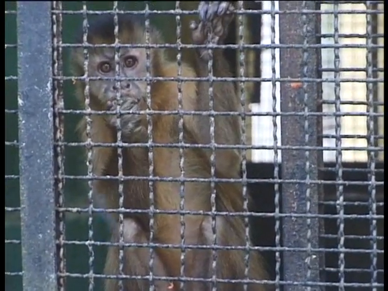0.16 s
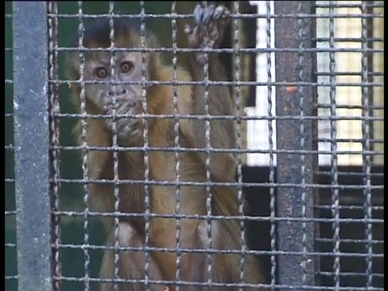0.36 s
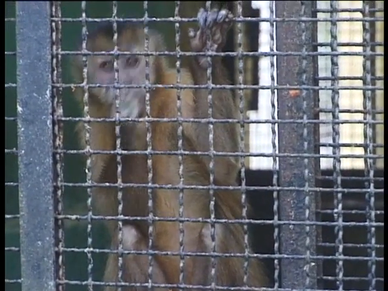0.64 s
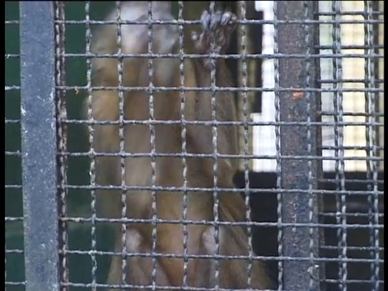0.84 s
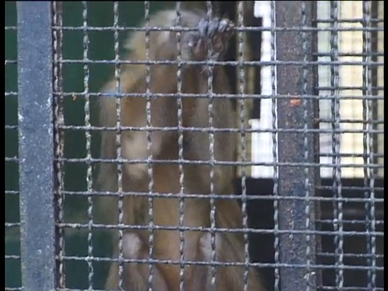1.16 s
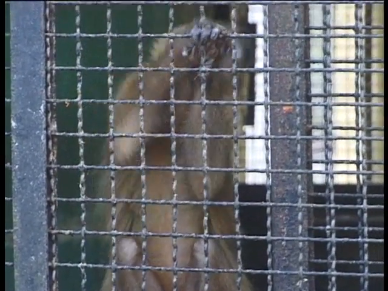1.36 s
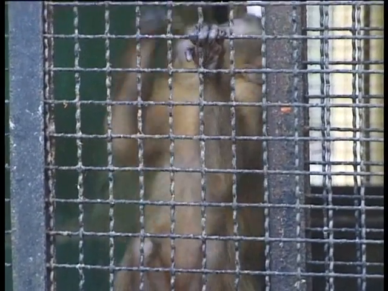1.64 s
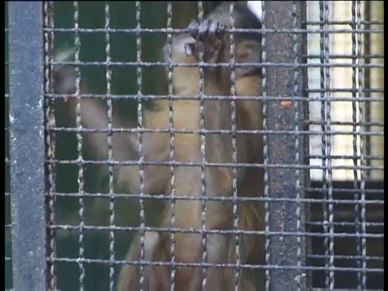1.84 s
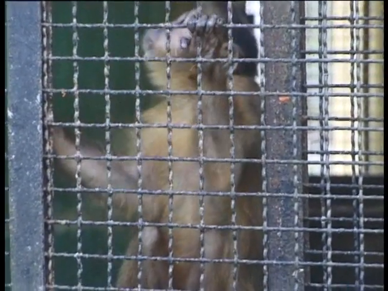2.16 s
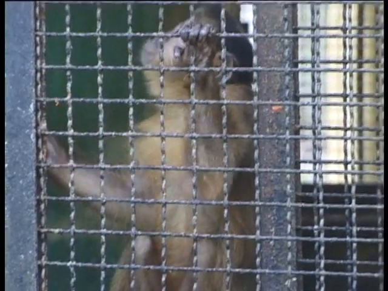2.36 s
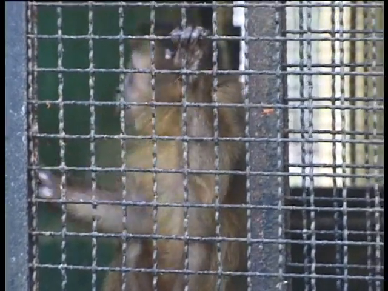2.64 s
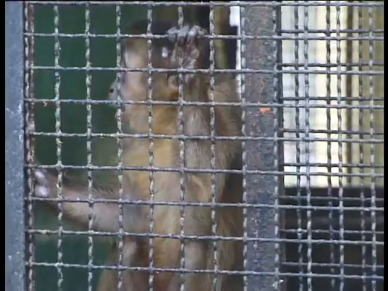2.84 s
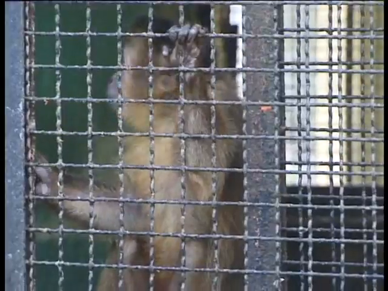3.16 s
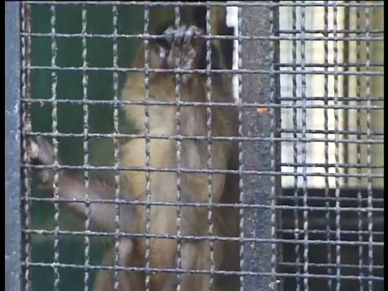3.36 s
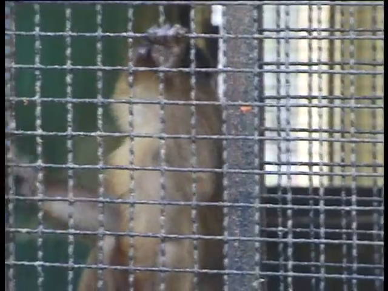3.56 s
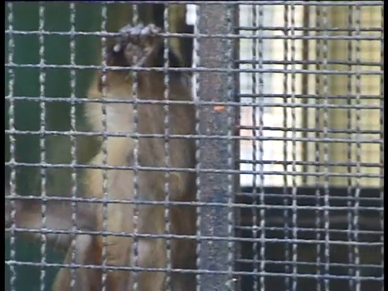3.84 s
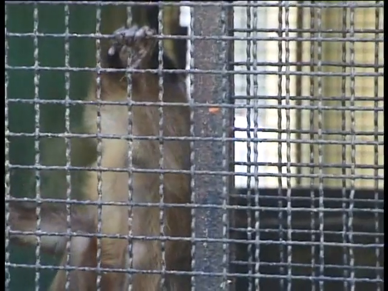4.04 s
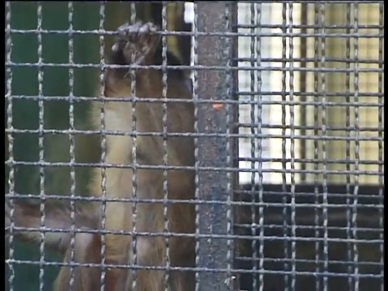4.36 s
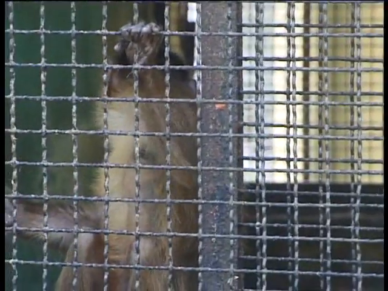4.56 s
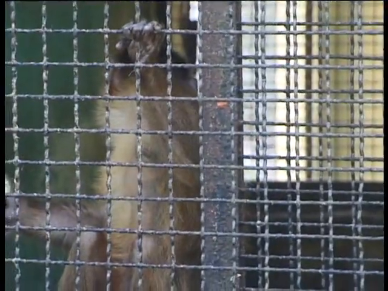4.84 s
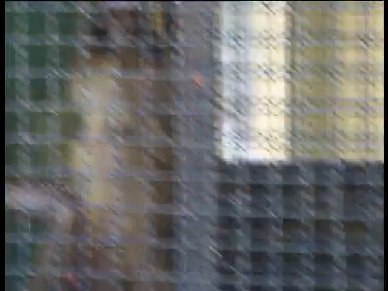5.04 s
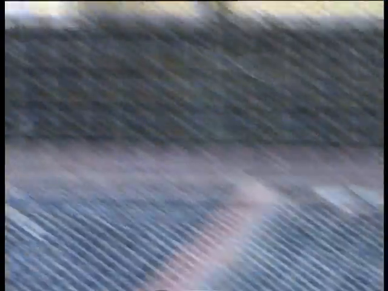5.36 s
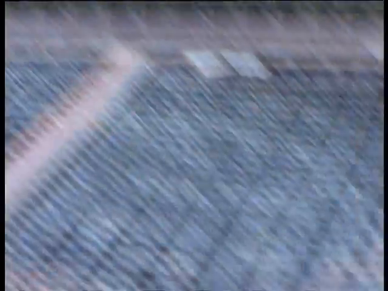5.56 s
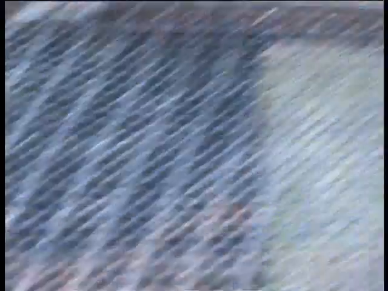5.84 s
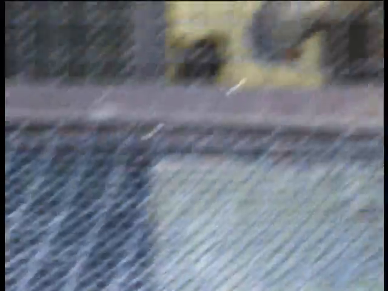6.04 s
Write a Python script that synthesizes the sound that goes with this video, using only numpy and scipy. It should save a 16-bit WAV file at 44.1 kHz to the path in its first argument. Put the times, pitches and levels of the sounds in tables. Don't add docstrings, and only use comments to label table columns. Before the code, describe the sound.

High, pure monkey whistles repeat in rapid runs inside a mesh enclosure, with gusty low rumble, faint rustles, claw ticks and soft grunts.

```python
import sys
import numpy as np
from scipy import signal
from scipy.fft import rfft, irfft, next_fast_len
from scipy.io import wavfile
from scipy.ndimage import uniform_filter1d, map_coordinates

SR = 44100
rng = np.random.default_rng(int(sys.argv[2]) if len(sys.argv) > 2 else 0)


def int16_out(signal):
    q = np.round(np.clip(np.atleast_2d(signal).T, -1, 1) * 32767)
    wavfile.write(sys.argv[1], SR, q.astype(np.int16))


def level_to_linear(level):
    exponent = np.asarray(level, float) / 20
    return 10 ** exponent


N = 273197


def unit(x):
    return x / np.sqrt(np.mean(x ** 2) + 1e-20)


def along(points, hz):
    f, v = np.transpose(points)
    return np.interp(np.log(hz + 1), np.log(f + 1), v)


def curves(rows):
    s, *cols = np.transpose(rows)
    return [np.interp(np.arange(N) / SR, s, c) for c in cols]


def wobble(rate):
    return map_coordinates(rng.standard_normal(1000), [np.arange(N) * rate / SR])


def sides(db):
    return level_to_linear(np.array([db / 2, -db / 2]))


def add(track, s, x):
    part = track[..., round(s * SR):round(s * SR) + x.shape[-1]]
    part += x[..., :part.shape[-1]]


def tone(hz, orders):
    phase = 2 * np.pi * np.cumsum(hz) / SR
    return np.sqrt(2) * sum(level_to_linear(db) * np.sin(k * phase + k) for k, db in orders)


def gate(t, length, rise, fall):
    opening = np.clip(t / rise, 0, 1)
    closing = np.clip((length - t) / fall, 0, 1)
    return np.sin(np.pi / 2 * opening * closing) ** 2


def rush(spectrum, alike, patchy_db):
    # (frequency [Hz], left minus right [dB])
    lean = [(60, -0.5), (180, -4), (550, -2.5), (1650, 2), (4970, 0.5), (15000, 2.5)]
    hz, _, z = signal.stft(rng.standard_normal((2, N + 4096)), SR, nperseg=2048)
    field = uniform_filter1d(rng.standard_normal(z.shape[1:]), size=20, axis=0)
    field = uniform_filter1d(field, size=3, axis=1)
    turn = np.arccos(np.clip(along(alike, hz), -1, 1))[:, None] / 2
    z = z * level_to_linear(along(spectrum, hz)[:, None] + patchy_db * unit(field))
    mid, side = z[0] * np.cos(turn), z[1] * np.sin(turn)
    pair = np.array([mid + side, mid - side]) * sides(along(lean, hz))[..., None]
    return unit(signal.istft(pair, SR, nperseg=2048)[1][:, :N])


def air():
    # (time [s], strength [dB])
    wind = [(0.0, -35.5), (0.55, -35), (0.96, -34.5), (1.5, -30.5), (1.53, -47.5), (1.58, -31.5),
            (2.83, -32.5), (3.07, -36.5), (3.72, -31), (3.84, -42.5), (3.96, -27.5), (4.02, -33.5),
            (4.74, -37.5), (4.77, -42.5), (5.57, -30.5), (5.64, -35), (6.14, -29.5), (6.19, -37.5)]
    # (time [s], half width [s], change [dB])
    gusts = [(.19, .08, 2.5), (.29, 0.052, -3), (.4, 0.14, 4), (.48, 0.019, -4.5), (.58, 0.025, 5.5),
             (1.26, 0.016, -6.5), (1.95, 0.021, 2.5), (2.6, 0.073, -0.5), (2.81, 0.034, 2), (3.65, 0.32, 0),
             (4.28, 0.065, -4.5), (4.47, 0.026, 5.5), (5.03, 0.11, 4), (5.12, 0.017, -5),
             (5.773, 0.0067, 11)]
    # (time [s], peak [dB], left minus right [dB])
    thumps = [(0.032, -21.5, 7), (0.425, -16.5, 4), (0.648, -15, -2), (0.81, -13, -7), (1.217, -13, -6.5),
              (1.4, -13.5, -5), (1.469, -33, -2.5), (1.578, -32, -9), (3.299, -35, -33), (3.473, -18.5, -5),
              (3.732, -12.5, -5), (3.946, -7.5, 3), (4.095, -18, -6), (4.301, -27, -25), (5.151, -15, -6),
              (5.255, -16.5, -5)]
    # (time [s], level [dB])
    turning = [(0, 0.5), (1.2, -0.5), (1.55, -3.5), (2, -1.5), (3.4, -2), (4.5, -6.5), (5.2, -5), (5.7, -8),
               (6.19, -8.5)]
    # (frequency [Hz], level per Hz [dB])
    rumble = [(8, -45), (20, -11.5), (50, 1), (103, -1), (180, -10), (300, -18.5), (470, -26.5), (800, -40),
              (1500, -97)]
    # (frequency [Hz], level per Hz [dB])
    park = [(250, -42), (450, -9.5), (800, -10), (1600, -12.5), (2700, -11.5), (4000, -12), (6000, -11.5),
            (8500, -18.5), (11000, -25.5), (15000, -28)]
    # (frequency [Hz], level per Hz [dB])
    hiss = [(2500, -36), (5000, -0.5), (7100, -8.5), (10000, -14.5), (13300, -25), (14700, -31.5),
            (15400, -23), (16000, -82)]
    # (frequency [Hz], left-right likeness)
    ports = [(30, 1), (90, 0.77), (180, 0.71), (350, 0.43)]
    # (frequency [Hz], left-right likeness)
    alike = [(60, 0.82), (180, -0.63), (550, 0.9), (1650, 0.43), (4970, -0.4), (15000, 0.16)]

    (buffet_db,), (turn_db,) = curves(wind), curves(turning)
    t = np.arange(N) / SR
    buffet_db = buffet_db + sum(db * np.exp(-((t - s) / half) ** 2) for s, half, db in gusts)
    port_lumps = np.array([wobble(27.0), wobble(36)])
    lumps = level_to_linear(1.1 * wobble(17) + 0.69 * port_lumps)
    out = level_to_linear(buffet_db + 0.5) * unit(lumps * rush(rumble, ports, patchy_db=1.08))
    out += level_to_linear(-45 + turn_db + 0.7 * wobble(8.3)) * rush(park, alike, patchy_db=1.27)
    out += level_to_linear(-58 + 0.38 * turn_db) * rush(hiss, alike, patchy_db=0.8)
    t = np.arange(-900, 900) / SR
    push = -t / 0.00097 * np.exp(-(t / 0.0015) ** 2 / 2)
    for s, db, pan in thumps:
        add(out, max(s - .015, 0), level_to_linear(db - 8.0) * sides(pan)[:, None] * push)
    return out


def whistler():
    # (time [s], length [s], pitch [Hz], level [dB], glide [Hz])
    first_trills = [(0.405, 0.029, 2785, -35.5, 122), (0.48, 0.021, 3060, -35.5, -103.0),
                    (0.553, 0.023, 3140, -30, -72.0), (0.63, 0.024, 3200, -31.5, -64),
                    (0.7016, 0.027, 3224, -32, -26), (0.836, 0.0066, 3340, -37.5, -50),
                    (0.846, 0.016, 3280, -39.5, 11), (0.871, 0.011, 3310, -43, 15),
                    (0.885, 0.008, 3290, -40, -100), (0.935, 0.027, 3340, -30.5, -43),
                    (1.0034, 0.024, 3346, -26, -25), (1.0707, 0.025, 3350, -23.5, -29),
                    (1.139, 0.021, 3350, -25, -28), (1.1928, 0.028, 3390, -25.5, -68),
                    (2.0797, 0.031, 2986, -33, -60), (2.1624, 0.019, 3160, -31.5, -79),
                    (2.236, 0.022, 3293, -29.0, -79), (2.3083, 0.023, 3377, -29, -90),
                    (2.385, 0.026, 3370, -27.5, -51), (2.461, 0.0266, 3485, -26, -141.0),
                    (2.5406, 0.022, 3487, -22, -52), (2.615, 0.022, 3574, -19, -122.0),
                    (2.686, 0.021, 3540, -19.5, -75), (2.7586, 0.019, 3660, -18, -117.0),
                    (2.8296, 0.018, 3755, -20.5, -162.0), (2.9043, 0.018, 3913, -21.5, -107.0),
                    (2.976, 0.02, 3758, -20.5, -308.0), (3.0557, 0.017, 3346, -32.5, -33)]
    # (time [s], length [s], pitch [Hz], level [dB], glide [Hz])
    later_trills = [(3.19, 0.043, 3357, -23.5, 42), (3.276, 0.019, 3705, -20, 94),
                    (3.3613, 0.019, 4150, -23, 23), (3.439, 0.022, 4218, -23.5, -131.0),
                    (3.5177, 0.018, 4176, -19.5, -292.0), (3.6017, 0.012, 3856, -21.5, -331.0),
                    (3.7723, 0.048, 3380, -24, 117), (3.8554, 0.021, 3660, -19, -52),
                    (3.934, 0.02, 3924, -19, -107.0), (4.0146, 0.016, 4065, -21.5, -194.0),
                    (4.109, 0.016, 3340, -40, -48), (4.5027, 0.02, 4186, -29, 18),
                    (4.598, 0.0233, 4374, -27.5, -100), (4.68, 0.016, 4250, -20, 50),
                    (4.7697, 0.013, 4077, -23.5, -39), (4.8535, 0.015, 4145, -21.5, -67),
                    (4.9387, 0.017, 3970, -33, -900), (5.286, 0.019, 3330, -36, -300)]
    # (time [s], pitch [Hz], level [dB])
    long_whistle = [(1.249, 3320, -35.5), (1.275, 3350, -24), (1.355, 3335, -22.5), (1.39, 3351, -29),
                    (1.44, 3355, -28), (1.487, 3340, -24), (1.508, 3328, -30), (1.544, 3342, -24.5),
                    (1.587, 3330, -32.5), (1.62, 3244, -39), (1.643, 3110, -42)]
    # (time [s], overtone [dB])
    mouth = [(.45, 8), (.65, -3), (.85, -2.5), (1.05, -12), (1.2, -13.5), (2.1, 3.5), (2.5, -9),
             (2.95, -22.5), (3.19, -17), (3.28, -27), (3.6, -24), (3.77, -10.5), (4.015, -32.5),
             (4.11, -18), (4.55, -2.5), (4.68, -9), (4.82, -6), (5.29, -4.5)]
    # (time [s], share of pitch)
    sag = [(.4, 0.062), (.5, 0.15), (.85, 0.057), (1.0, 0.13), (1.2, 0.082), (2.08, .04), (2.2, 0.23),
           (2.7, 0.076), (2.98, 0.16), (3.06, 0.035), (3.28, 0.13), (3.36, 0.23), (3.52, 0.21),
           (3.6, 0.054), (3.77, 0.038), (3.9, 0.1), (4.5, 0.1), (4.68, 0.13), (4.86, 0.08), (4.94, .05),
           (5.29, 0.077)]

    out, notes = np.zeros((2, N)), first_trills + later_trills
    gaps = np.diff([row[0] for row in notes], prepend=0)
    openers = (gaps > .12) | (gaps < .04)
    for (s, length, hz, db, glide), after_gap in zip(notes, openers):
        opener = after_gap and s != first_trills[5][0]
        over_db, droop = np.interp(s, *np.transpose(mouth)), np.interp(s, *np.transpose(sag))
        t = np.arange(round((length + 0.0033) * SR)) / SR
        ending = np.exp((t - t[-1]) / 0.0023)
        flick = (0.2 if opener else 1) * np.clip(4300 - hz, 0, 900) * np.exp(-t / 0.0012)
        even_glide = 0.72 * glide * t / length
        pitch = (hz + even_glide) * (1 - droop * ending) + flick

        thin_third = s > 5.1 or 3.7 < s < 3.8 or 3.1 < s < 3.2 or s < .52
        third_db = over_db - 16.5 - 14 * thin_third - 14 * max(hz - 3350, 0) / 1000 - 4 * (s < 1.3)
        hook_db = min(22, 2 - over_db) if s < 4.4 else -12
        overtones = tone(pitch, [(2, over_db), (3, third_db)])
        overtones = level_to_linear(hook_db * ending - 0.083 * flick) * overtones
        parts = np.array([tone(pitch, [(0.99, 0.0044)]), overtones])

        swells = opener and length > .025
        swell_db = -8 * swells * (1 - t / t[-1])
        shape = gate(t, t[-1], rise=0.0027 + 0.0011 * (hz > 4050), fall=0.0065 + 0.0037 * swells)
        add(out, s - .001, level_to_linear(db + swell_db) * shape * parts)

    t = np.arange(N) / SR
    unsteady = 1.5 + 1.9 * np.exp(-((t - .87) / .04) ** 2)
    out = out * level_to_linear(1.17 * wobble(90) * unsteady)

    hz, db = curves(long_whistle)
    start, end = long_whistle[0][0], long_whistle[-1][0]
    t = t - start
    hz = hz + 3 * wobble(39.45) + 700 * np.exp(-np.abs(t) / 0.0029)
    held = gate(t, end - start, rise=0.0027, fall=0.0067) * level_to_linear(db)
    return out + held * [tone(hz, [(1, 0.0055)]), tone(hz, [(2, -17.5), (3, -40.5)])]


def near_walls(x):
    # (delay [s], level [dB], left minus right [dB])
    echoes = [
        (.0043, -35.5, -5),
        (0.0104, -13.5, 2),
        (.017, -22, 2),
    ]
    out = np.zeros((2, N))
    for s, db, pan in echoes:
        add(out, s, level_to_linear(db) * sides(pan)[:, None] * x)
    return out


def walls(x):
    # (frequency [Hz], time to fall 60 dB [s])
    decay = [(700, 0.32), (3500, 0.43), (8000, 0.33)]
    out, step = np.zeros((2, N)), round(.31 * SR)
    for i in range(0, N, step):
        hz, t, z = signal.stft(rng.standard_normal((2, SR // 2)), SR, nperseg=256)
        tail = signal.istft(z * level_to_linear(-60 * t / along(decay, hz)[:, None]), SR, nperseg=256)[1]
        build = 1 - np.exp(-np.arange(tail.shape[1]) / SR / 0.0024)
        tail = (tail + 0.08 * tail[::-1]) * build
        answer = signal.fftconvolve(x[None, i:i + step], tail / np.linalg.norm(tail[0]), axes=1)
        add(out, i / SR + .008, answer)
    return out


def rustle():
    # (time [s], length [s], centre [Hz], level [dB])
    brushes = [(0.75, 0.071, 3260, -41.5), (0.752, 0.048, 7000, -51), (1.735, 0.017, 885, -46),
               (1.973, 0.045, 920, -41.5), (1.972, 0.029, 3280, -43.5), (2.139, 0.072, 5600, -47.5),
               (2.214, 0.081, 520, -46), (3.291, 0.16, 1750, -54), (3.3, 0.17, 6140, -45),
               (3.452, 0.18, 5730, -47.5), (3.524, 0.41, 10300, -61.5), (3.771, 0.21, 6100, -47),
               (5.164, 0.31, 1170, -55.5), (5.299, 0.041, 4020, -45), (5.493, 0.085, 5000, -53.5),
               (5.509, 0.11, 7000, -54.5), (5.49, 0.072, 9000, -56.5), (5.66, 0.012, 2550, -52),
               (5.816, 0.044, 2200, -40.5), (5.961, 0.11, 2480, -52), (6.101, 0.052, 2500, -50),
               (6.143, 0.065, 5960, -53)]
    # (time [s], peak [dB])
    ticks = [(2.33, -42), (.765, -37), (.772, -39), (.783, -41), (4.526, -36.5), (5.306, -32), (5.313, -36),
             (5.318, -34), (5.327, -37), (5.669, -46), (5.825, -51), (5.845, -51)]
    out, noise = np.zeros((2, N)), rng.standard_normal((32, 3, 12000))
    t = np.arange(noise.shape[2]) / SR
    for (s, length, hz, db), (left, right, size) in zip(brushes, noise):
        grain_db = 2.2 * unit(uniform_filter1d(size, size=60))
        clump_db = 1.3 * unit(uniform_filter1d(size[::-1], size=700))
        grains = level_to_linear(grain_db + clump_db) * [left, right + .5 * left]
        band = signal.butter(3, [hz * 0.47, min(hz * 1.37, 14000)], "band", fs=SR, output="sos")
        shape = gate(t, length * 1.41, rise=0.26 * length, fall=0.98 * length)
        add(out, s, level_to_linear(db) * unit(signal.sosfilt(band, grains)) * shape)
    wire = signal.butter(2, [1100, 6500], "band", fs=SR, output="sos")
    for (s, db), (tick, *_) in zip(ticks, noise[::-1]):
        click = signal.sosfilt(wire, tick * level_to_linear(-60 * t / 0.02))
        add(out, s, level_to_linear(db) * click * np.ones((2, 1)))
    return out


def mates():
    # (time [s], length [s], pitch [Hz], level [dB], echo [dB])
    calls = [
        (1.709, 0.035, 765, -37.5, -2),
        (1.941, 0.042, 794, -38.5, -2),
        (5.281, 0.0079, 4050, -40.5, 9.5),
        (5.301, 0.016, 3910, -48.5, -13),
        (5.751, 0.023, 2150, -37, -4),
        (5.806, 0.035, 769, -46.5, 10.5),
        (5.942, 0.0495, 2063, -52.5, 12.5),
        (5.981, 0.057, 803, -49.5, 10.5),
        (6.164, 0.042, 805, -52.5, 15),
    ]
    # (multiple of pitch, level [dB])
    voices = [
        [(1, -2.5), (2, -2.5), (3, -5), (4, -15), (5, -14), (6, -10), (7, -35)],
        [(1, 1), (2, -5.5), (3, -7), (4, -10.5), (5, -6), (6, -22), (7, -29)],
        [(1, 1)],
        [(1, 8.5)],
        [(1, -22), (2, 0.5), (3, -14)],
        [(1, -13), (2, 5), (3, 0), (4, -2), (5, 2), (6, -13), (7, -13)],
        [(1, 0), (2, -7), (3, -6.5)],
        [(1, -5.5), (2, 0.5), (4, -21), (5, -3.5)],
        [(1, -6), (2, 5), (4, -8), (5, 4.5)],
    ]
    out = np.zeros((2, N))
    for (s, length, hz, db, echo_db), voice in zip(calls, voices):
        t = np.arange(round((length + 0.0067) * SR)) / SR
        ending = np.exp((t - t[-1]) / 0.0064)
        fall = 0.24 if hz < 1000 else 0.026
        pitch = hz * (1 - 0.038 * (2 * t / length - 1) ** 2 - fall * ending)
        overtones = level_to_linear(-22 * ending) * tone(pitch, voice[1:])
        call = level_to_linear(db) * gate(t, t[-1], rise=0.0075, fall=0.0063) * (tone(pitch, voice[:1]) + overtones)
        add(out, s, np.array([call, level_to_linear(echo_db) * call]))
    hoarse = 1 + 0.21 * unit(uniform_filter1d(rng.standard_normal(N), size=90))
    return out * level_to_linear(2.0 * wobble(60)) * hoarse


def bird():
    # (time [s], length [s], from [Hz], to [Hz], level [dB])
    slurs = [
        (2.082, .03, 3800, 7500, -54),
        (2.112, .055, 6200, 4200, -53),
    ]
    out = np.zeros(N)
    for s, length, from_hz, to_hz, db in slurs:
        t = np.arange(round(length * SR)) / SR
        pitch = from_hz + (to_hz - from_hz) * t / length
        add(out, s, level_to_linear(db) * gate(t, length, rise=0.0073, fall=.008) * tone(pitch, [(1, 0)]))
    return out


def swish():
    # (time [s], length [s], from [Hz], to [Hz], level [dB])
    strokes = [
        (3.303, 0.18, 6650, 7360, -49),
        (3.472, .15, 6250, 5830, -55),
        (5.498, 0.074, 4330, 5640, -56),
        (5.523, 0.12, 7100, 8200, -53),
        (5.507, 0.051, 8800, 9200, -59),
        (5.552, 0.094, 3940, 3640, -58),
        (5.576, 0.071, 5600, 5640, -60),
    ]
    out, noise = np.zeros((2, N)), rng.standard_normal((12, 2, 2, 9000))
    t = np.arange(noise.shape[3]) / SR
    soft = signal.butter(2, 500, fs=SR, output="sos")
    for (s, length, from_hz, to_hz, db), pair in zip(strokes, noise):
        hz = from_hz + (to_hz - from_hz) * np.minimum(t / length, 1)
        phase = 2 * np.pi * np.cumsum(hz) / SR
        a, b = unit(signal.sosfilt(soft, pair))
        breath = a * np.cos(phase) + b * np.sin(phase)
        add(out, s, level_to_linear(db) * breath * gate(t, length, rise=0.26 * length, fall=0.32 * length))
    return out


def scene():
    # (time [s], left minus right [dB])
    balance = [(.41, -14), (.49, -8), (.63, -13.5), (.72, -7.5), (1.2, -3), (2.12, -11.5), (2.35, -4.5),
               (2.69, -4), (2.83, -9), (2.9, -3), (3.28, -5), (3.51, 2.5), (3.6, -6), (3.77, -4),
               (3.86, -4), (3.93, -2.5), (4.83, 0), (4.94, -11)]
    # (time [s], echo [dB])
    facing = [(.4, 4.5), (.6, -4), (.72, 6.5), (.84, 6), (1, 5), (1.2, 3.5), (1.45, -1.5), (2.1, 0),
              (2.35, 3), (2.55, 1), (2.8, -4.5), (3.0, 0), (3.06, 5), (3.19, 2.5), (3.28, 0.5), (3.44, 0),
              (3.5, 2), (3.8, -7.5), (4.02, -0.5), (4.5, -0.5), (4.7, 1.5), (4.85, -2), (5.29, 2.5)]
    (base, over), (far, sent) = whistler(), mates()
    near = base * sides(curves(balance)[0]) + over * sides(-6.0)[:, None]
    size = next_fast_len(N)
    lag = np.exp(-2j * np.pi * np.fft.rfftfreq(size, 1 / SR) * 40e-6)
    near[0] = irfft(rfft(near[0], size) * lag, size)[:N]
    wet = level_to_linear(-9.5) * walls(level_to_linear(curves(facing)[0]) * (base + over) + sent)
    animals = near + near_walls(base + over) + far * sides(-6.0)[:, None] + wet * sides(-1.0)[:, None]
    return animals + rustle() + air() + bird() + swish()


def starve(x, floor_db, edge_hz, size, keep):
    hz, _, z = signal.stft(x, SR, nperseg=size)
    power, wide = np.mean(abs(z) ** 2, axis=0), size // 64
    band = np.arange(len(hz)) // wide
    centre = np.minimum(band * wide + wide // 2, len(hz) - 1)
    level = uniform_filter1d(power, size=wide, axis=0)[centre]
    luck_db = 6 * rng.standard_normal((band[-1] + 1, z.shape[2]))[band]
    tone_top = power[hz > 2000].max(axis=0)
    attack = np.maximum(tone_top - np.roll(tone_top, 4096 // size), 0)
    debt = np.maximum(attack, .3 * np.roll(attack, 1) + .15 * np.roll(attack, -1))
    weak = (level < debt * level_to_linear(2 * (floor_db + luck_db))) & (power < keep * level)
    lost = weak & (hz[:, None] > edge_hz)
    return signal.istft(z * ~lost, SR, nperseg=size)[1][:, :N]


def low_pass(x):
    return signal.sosfilt(signal.butter(12, 15600, fs=SR, output="sos"), x)


def record(dry):
    # (time [s], depth [dB], hold [s])
    ducks = [
        (0.243, -3, 0.077),
        (1.47, 2, 0.025),
        (3.762, 0.5, 0.021),
        (4.479, -4.5, 0.012),
        (5.064, -1, 0.032),
        (5.637, -6, 0.025),
        (6.087, -4, 0.031),
    ]
    t = np.arange(N) / SR
    duck_db = sum(db * gate(t - s, hold + 0.0067, rise=0.00057, fall=0.0086) for s, db, hold in ducks)
    edge = signal.cheby2(14, 50, 15400, fs=SR, output="sos")
    return low_pass(signal.sosfilt(edge, dry * level_to_linear(duck_db)))


dry = scene()
out = record(dry)
int16_out(out)
```